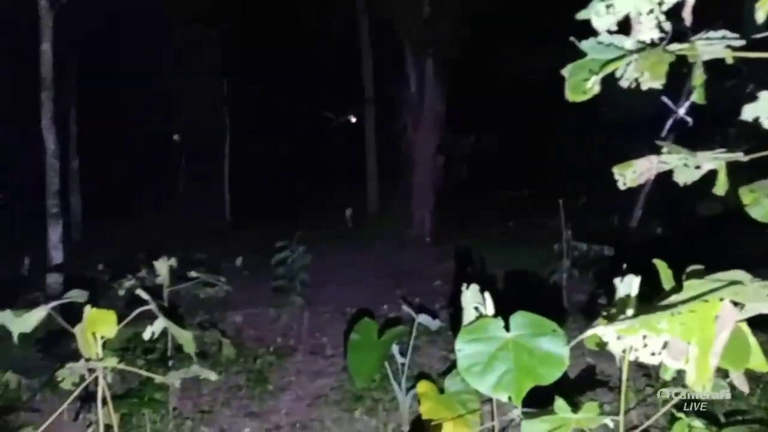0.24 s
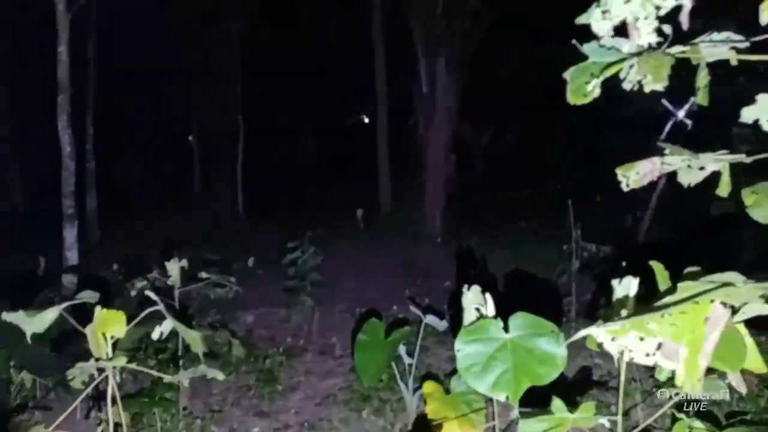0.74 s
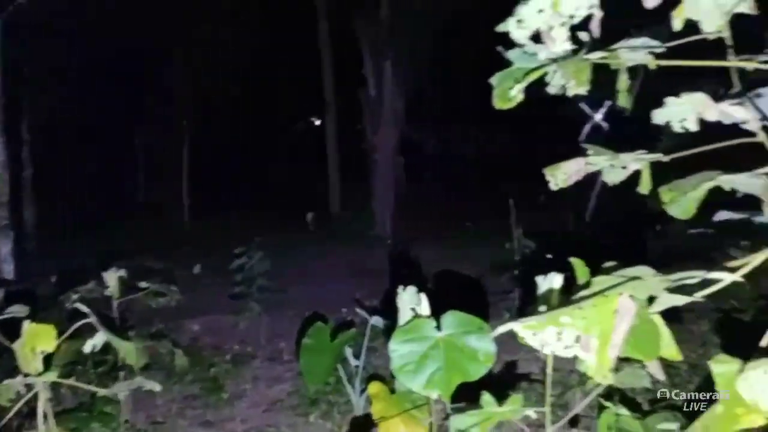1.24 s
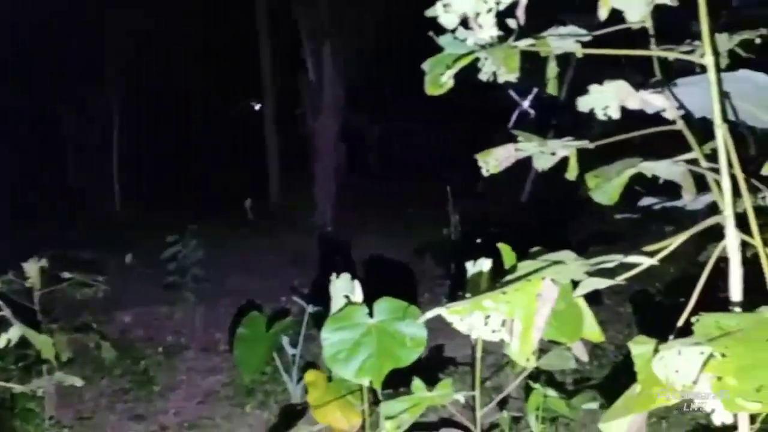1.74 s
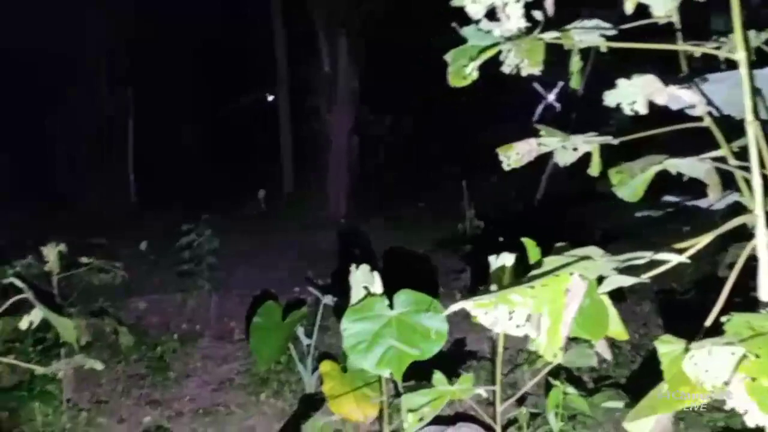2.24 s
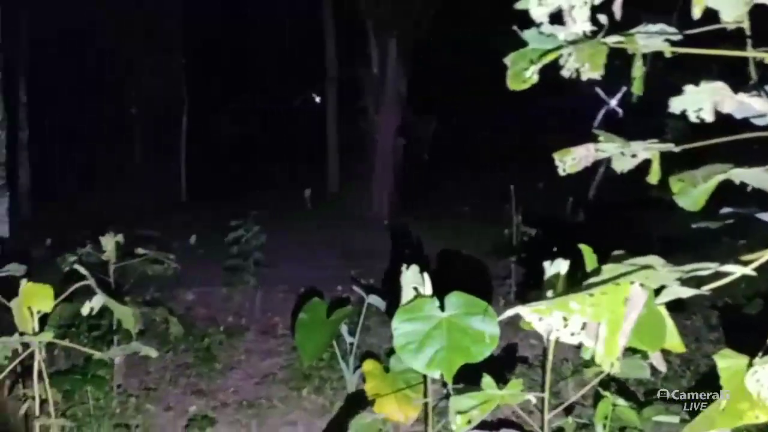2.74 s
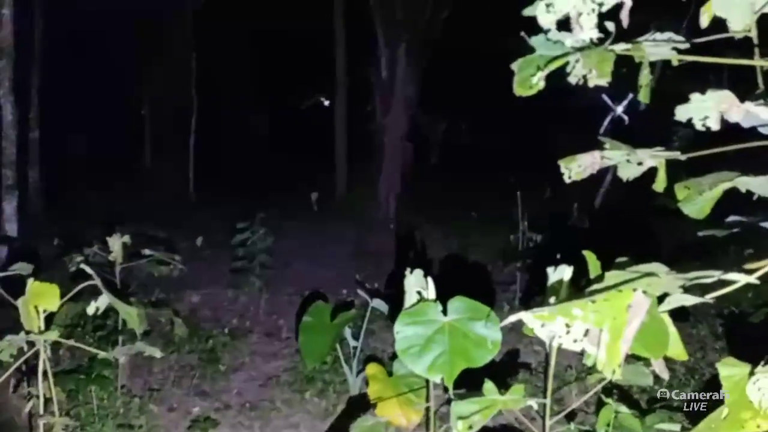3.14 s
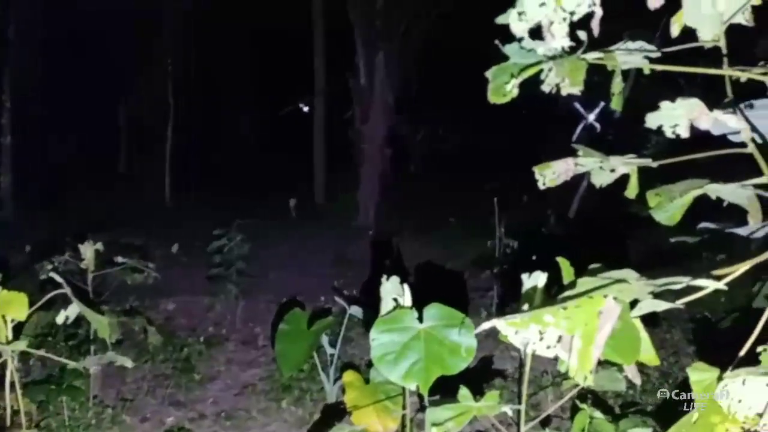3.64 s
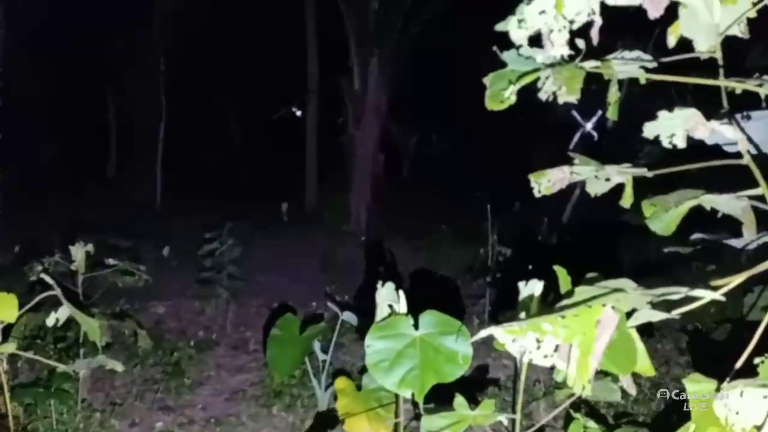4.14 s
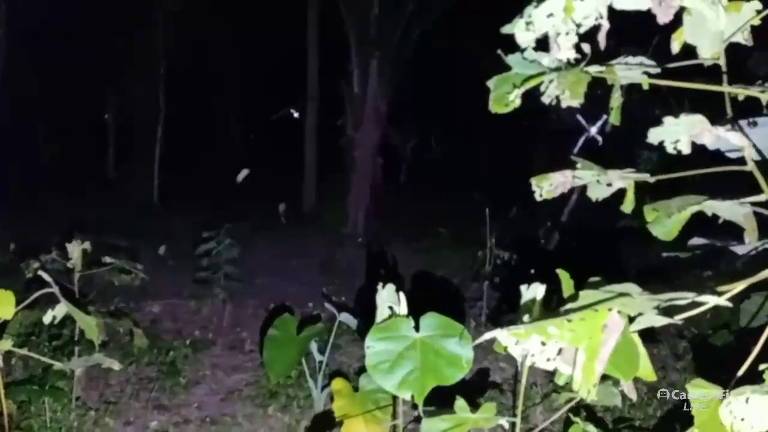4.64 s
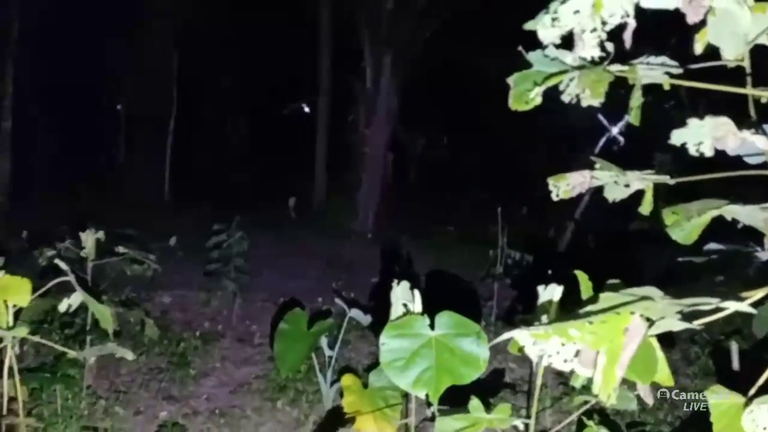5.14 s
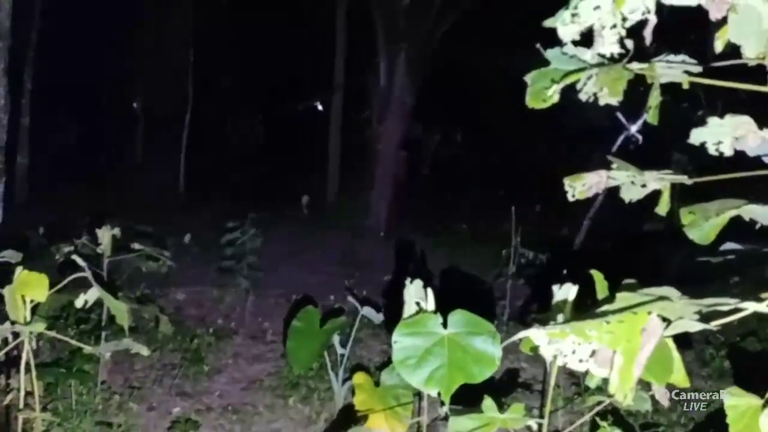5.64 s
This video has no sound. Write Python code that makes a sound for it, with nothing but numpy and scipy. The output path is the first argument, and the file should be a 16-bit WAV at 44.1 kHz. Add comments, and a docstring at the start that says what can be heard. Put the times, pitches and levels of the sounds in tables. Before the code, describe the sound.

A night insect chorus at the edge of a wood, heard on a hand-held microphone. It opens with a loud, bright, finely fluttering hiss that fades by about 0.5 s, leaving a quieter, silky high hiss that slowly grows. Far crickets chirp in short groups of falling tones, blurred by trunks and leaves, most clearly until 1.4 s and again from 2.5 to 4 s, then fainter and fairly regular. Tree crickets trill rapidly in bouts at about 0-1.1, 1.6-3.3 and 3.9-5.5 s, lingering weakly between. A close field cricket gives three sharp, shrill chirps at about 1.7, 1.95 and 2.2 s, the first starting softly, with a short woodland tail. A faint buzz passes near 4.3-4.5 s. Thin rising rasps and very high fizz gather from 4.6 s to the end. Quiet night air and soft low handling bumps, clearest near 2 s, lie underneath.

```python
"""Countless far insects merge into a high hiss at the edge of a wood by night, heard on a hand-held camera.
The hiss is noise in unevenly swelling bands, louder and brighter in an opening that fades in about half a second.
Tree crickets trill falling notes, and far crickets answer from the trees as scattered tones.
A field cricket chirps three times close by, in falling tones with a flaring third harmonic.
Thin rising rasps of sliding noise crowd towards the end; handling bumps and night air lie underneath."""
import sys
import numpy as np
from scipy import signal
from scipy.fft import rfft, irfft
from scipy.io import wavfile
from scipy.ndimage import uniform_filter1d

SR = 44100
rng = np.random.default_rng(int(sys.argv[2]) if len(sys.argv) > 2 else 0)


def store_pcm(level_fs):
    """Save levels as 16-bit WAV."""
    pcm = np.round(np.clip(level_fs, -1, 1) * 32767).astype(np.int16)
    wavfile.write(sys.argv[1], SR, np.atleast_2d(pcm).T)


N = 259704
T = np.arange(N) / SR
FRAME, HOP = 1024, 256  # samples in the short-time spectra of the hisses
BIN_HZ = np.fft.rfftfreq(FRAME, 1 / SR)


def gain_of(db):
    """Decibels to amplitude."""
    return 10 ** (np.asarray(db) / 20)


def evened(x):
    """Scales to an rms of 1."""
    return x / np.sqrt(np.mean(x ** 2) + 1e-20)


def level(curve):
    """Gain at every sample, straight in dB between rows of (t/s, level/dB)."""
    return gain_of(np.interp(T, *np.transpose(curve)))


def swell(start, end, db, rise_s, fall_db_per_s):
    """Gain at every sample: rises until start, holds until end, then dies away."""
    rise = np.clip(1 + (T - start) / rise_s, 0, 1)
    return rise * gain_of(db - fall_db_per_s * np.maximum(T - end, 0))


def add(mix, s, sound):
    """Mixes a sound in at time s, or at the very start if s is negative."""
    part = mix[max(round(s * SR), 0):][:len(sound)]
    part += sound[:len(part)]


def band(hz, width_hz):
    """Noise of rms 1 in one bell-shaped band."""
    bell = np.exp(-((np.fft.rfftfreq(N, 1 / SR) - hz) / width_hz) ** 2)
    return evened(irfft(rfft(rng.standard_normal(N)) * bell, N))


def drift(width_hz):
    """Slow chance of rms 1: noise kept to the lowest frequencies."""
    return band(0, width_hz)


def hiss(spectrum, patchy_db):
    """Many far voices merged: noise of rms 1 whose narrow bands swell and sink on their own."""
    real, imaginary, patches = rng.standard_normal((N // HOP + 5, len(BIN_HZ), 3)).T
    for _ in range(2):  # smooth over neighbouring bands, then over time
        patches = uniform_filter1d(patches, size=4, axis=0)
        patches = evened(uniform_filter1d(patches, size=11, axis=1))
    f, db = np.transpose(spectrum)
    colour = np.interp(np.log(BIN_HZ + 1), np.log(f), db, left=-70)
    bins = (real + 1j * imaginary) * gain_of(colour[:, None] + patchy_db * patches)
    return evened(signal.istft(bins, nperseg=FRAME, noverlap=FRAME - HOP)[1][:N])


def wood(x, t60, count=500):
    """Scatter from trunks and leaves: sparse echoes that die away by 60 dB in t60 seconds."""
    delay = rng.uniform(.003, .45, count)
    echo = rng.choice([-1, 1], count) * gain_of(-60 * delay / t60)
    taps = np.zeros(SR // 2)
    np.add.at(taps, (delay * SR).astype(int), echo)
    return signal.fftconvolve(x, taps / np.linalg.norm(taps))[:N]


def opening_gain():
    """Gain of the loud opening: an early peak, an even fade in dB and a stop."""
    peak_s, end_s, stop_s = 0.068, 0.55, 0.18
    stop = np.clip((end_s - T) / stop_s, 0, 1)
    return stop * swell(peak_s, peak_s, db=-31.5, rise_s=0.47, fall_db_per_s=32.5)


def far_chorus():
    """Far insects merge into a hiss that grows slowly louder, most uneven where few voices sing."""
    # how the distant hiss spreads over pitch: (f/Hz, relative level/dB per Hz)
    chorus_spectrum = [(3000, -52), (4150, -19.5), (5050, -17), (5700, -6), (6300, -7.5), (7000, -1.5),
                       (7500, -0.5), (8300, -7), (9300, -13.5), (10300, -18), (10950, -14), (11500, -27),
                       (13500, -27), (15300, -16)]
    # how unevenly its bands swell: (f/Hz, spread/dB)
    patchiness = [(4000, 4), (5000, 5), (5700, 2.4), (7500, 1.1), (8700, 1.6), (10000, 3.3), (11500, 2.6),
                  (15000, 1.3)]
    start_db, growth_db_per_s = -49.77, 0.74
    spread_db = np.interp(BIN_HZ, *np.transpose(patchiness))[:, None]
    return hiss(chorus_spectrum, spread_db) * gain_of(start_db + growth_db_per_s * T)


def opening_chorus(treble_fade=0.16):
    """The louder, brighter hiss of the opening: it flutters finely and its treble fades faster than its body."""
    # how the opening hiss spreads over pitch: (f/Hz, relative level/dB per Hz)
    opening_spectrum = [(2900, -40), (3500, -5.5), (4400, -5), (5400, -14), (6000, -10), (6800, -12),
                        (7400, -1.5), (7900, -1), (8500, -7), (9200, -19), (10800, -13.5), (13000, -17.5),
                        (14800, -8.5), (15800, -10)]
    bright = hiss(opening_spectrum, patchy_db=2.0) * (1 + 0.049 * drift(110))
    fade = opening_gain()
    body = signal.sosfiltfilt(signal.butter(4, 9000, fs=SR, output="sos"), bright)
    treble = (bright - body) * (fade / fade.max()) ** treble_fade
    return fade * (body + treble)


def night_air():
    """Quiet broad noise of the open night, growing slowly and louder during the opening fade."""
    # how the air noise spreads over pitch: (f/Hz, relative level/dB per Hz)
    air_spectrum = [(25, -25), (52, -35), (85, -2.5), (140, 1.5), (220, -1.5), (450, -6), (1000, -6.5),
                    (1400, -2), (1900, -7), (3000, -5), (4200, -6.5), (12000, -24.5)]
    start_db, growth_db_per_s = -66, 0.6442
    opening_db = -25.5  # against the opening hiss
    gain = np.hypot(gain_of(start_db + growth_db_per_s * T), gain_of(opening_db) * opening_gain())
    return hiss(air_spectrum, patchy_db=2.0) * gain


def trill_gain():
    """Bouts that set in quickly and break off into a weaker, unsteady trill; louder during the opening fade."""
    # bouts of the trill: (full from t/s, end t/s, level/dB)
    trill_bouts = [(0, 1.084, -52.5), (1.557, 3.29, -53), (3.9, 5.517, -52.5), (5.71, 5.72, -62)]
    rise_s, fall_db_per_s = 0.094, 83
    linger_db, linger_fall_db_per_s = -9, 15  # against the bout
    opening_db = -8.5  # against the opening hiss
    power = (gain_of(opening_db) * opening_gain()) ** 2
    flutter = gain_of(-0.5 * drift(28))
    for start, end, db in trill_bouts:
        bout = swell(start, end, db, rise_s, fall_db_per_s)
        linger = flutter * swell(start, end, db + linger_db, rise_s, linger_fall_db_per_s)
        power = power + np.maximum(bout, linger) ** 2
    return np.sqrt(power)


def tree_crickets(glide_hz=340, waver_hz=40):
    """Each singer repeats a short falling note; echoes fill the gaps and beat with it."""
    # the trilling singers: (middle pitch f/Hz, strokes per s, relative level/dB)
    trill_singers = [(3640, 24.2, -1.5), (3594, 29, -6.5), (3694, 22.6, -7)]
    out = np.zeros(N)
    for hz, per_s, db in trill_singers:
        cycle = np.cumsum(per_s * (1 + .02 * drift(3))) / SR % 1 - .5
        pitch = hz - glide_hz * cycle + waver_hz * drift(58.8)
        contact = np.exp(-(cycle / .1) ** 2)
        song = contact * np.sin(2 * np.pi * np.cumsum(pitch) / SR)
        out += gain_of(db) * (gain_of(-8) * evened(song) + evened(wood(song, t60=0.43)))
    steady = out / np.sqrt(uniform_filter1d(out ** 2, size=8000))  # they sing with even effort
    return steady * trill_gain()


def far_low_calls():
    """A few far, low calls: a narrow band of noise that swells and dies away."""
    # the low calls: (full from t/s, end t/s, level/dB)
    call_times = [(0, .05, -57), (.22, .37, -56), (0.836, 1, -74), (1.08, 1.078, -61)]
    gain = sum(swell(start, end, db, rise_s=.07, fall_db_per_s=160) for start, end, db in call_times)
    return band(hz=1656, width_hz=77) * gain


def handling(width_share=0.34):
    """Dull puffs of band noise as the hand shifts on the camera."""
    # soft bumps and scuffs: (middle t/s, level/dB, centre f/Hz, length/s)
    hand_bumps = [(.08, -69, 420, .26), (.151, -67, 133, .28), (0.303, -65, 420, .09),
                  (.436, -61.5, 467, .091), (0.821, -74.5, 346, .24), (1.262, -67.5, 140, .22),
                  (1.518, -65, 106, 0.093), (2.038, -56, 142.6, 0.1495), (2.121, -65.5, 107, .68),
                  (2.5, -66, 84, 0.052), (5.65, -66, 88, .29)]
    out = np.zeros(N)
    for s, db, hz, length in hand_bumps:
        size = int(length * SR)
        puff = evened(band(hz, width_share * hz)[:size] * signal.windows.tukey(size, .8))
        add(out, s - length / 2, gain_of(db) * puff)
    return out


def faint_chirps(spread_s=.015, spread_db=1.5, spread_hz=120, count=9):
    """A loosely regular run of long chirps growing fainter: rows of (t/s, level/dB before trim, f/Hz, strokes)."""
    from_s, gap_s = 4.1, .205
    start_db, fade_db_per_s, middle_hz = -57, 2.5, 4720
    rows = []
    for k, (late, loud, high) in enumerate(rng.standard_normal((count, 3))):
        s = k * gap_s + spread_s * late
        db = start_db - fade_db_per_s * s + spread_db * loud
        rows.append((from_s + s, db, middle_hz + spread_hz * high, 4))
    return rows


def far_crickets(stroke_gap=.036, stroke_s=0.0204, glide_hz=1300, trim_db=8.0, lead_db=-11):
    """Chirps from afar: the overtones are lost and only scatter arrives, new for each stroke."""
    # clear chirps among the trees: (first full stroke t/s, level/dB before trim, middle pitch f/Hz, strokes)
    clear_chirps = [(.005, -41.5, 4350, 3), (.21, -49, 4950, 3), (.37, -47, 4910, 3),
                    (.842, -46.5, 4660, 2), (1.028, -46.5, 4660, 3), (1.248, -48.5, 4600, 2),
                    (2.53, -53, 4690, 3), (2.925, -51, 4770, 3), (3.16, -47.5, 4740, 2),
                    (3.371, -50.5, 4760, 3), (3.59, -50, 4730, 3), (3.85, -48.5, 4770, 2)]
    out = np.zeros(N)
    t = np.arange(0, stroke_s, 1 / SR)
    for s, db, hz, count in [*clear_chirps, *faint_chirps()]:
        pitch = hz - glide_hz * (t / stroke_s - .5)
        tone = np.hanning(len(t)) * np.sin(2 * np.pi * np.cumsum(pitch) / SR)
        for k in range(-1, round(count)):  # one soft stroke leads in
            stroke_gain = gain_of(db + lead_db * (k < 0))
            add(out, s + k * stroke_gap, stroke_gain * wood(tone, t60=0.32, count=1200))
    return gain_of(trim_db) * out


def rasps(length=.05, start_hz=12100, rise_hz=3700, trim_db=-2, faint_per_s=8, spread_db=4):
    """Small bush crickets scrape: bands of noise that slide upwards, blurred by the leaves."""
    # the clearest rasps: (t/s, level/dB before trim)
    clear_rasps = [(3.07, -60), (4.355, -60), (4.61, -53), (4.68, -55), (5.2, -55), (5.385, -55),
                   (5.83, -52)]
    faint_db, growth_db_per_s = -70, 2  # before trim
    out = np.zeros(N)
    t = np.arange(0, length, 1 / SR)
    grit = band(0, width_hz=1000)
    pitch = start_hz + rise_hz * t / length
    slide = np.sin(2 * np.pi * np.cumsum(pitch) / SR) * signal.windows.tukey(len(t), .2)
    # faint ones come at random and grow louder
    faint_s = np.cumsum(rng.uniform(.5, 1.5, 80)) / faint_per_s
    faint_levels = faint_db + growth_db_per_s * faint_s + spread_db * rng.uniform(-1.1, 1, len(faint_s))
    for s, db in [*clear_rasps, *zip(faint_s, faint_levels)]:
        scrape = evened(slide * grit[rng.integers(N // 2):][:len(t)])
        add(out, s, gain_of(db + trim_db) * wood(scrape, t60=0.18, count=1500))
    return out


def fizz():
    """A very high hiss that goes with the rasps and grows with them."""
    # how the fizz spreads over pitch: (f/Hz, relative level/dB per Hz)
    fizz_spectrum = [(9000, -21), (11800, -5), (13500, -26), (14500, 2), (15400, 1), (16000, -2)]
    # its growth: (t/s, level/dB)
    fizz_levels = [(0, -79), (2.7, -73), (4.1, -69), (4.7, -56), (5.89, -53)]
    return hiss(fizz_spectrum, patchy_db=0.5) * level(fizz_levels)


def stroke(second_db=-28, third_db=0, shrill_hz=15500, shrill_width_hz=1000, bite_db=1.5):
    """The scraper runs along the file once: a falling tone whose third harmonic flares in a high resonance."""
    # the scraper catches twice more as the wings close: (t/s from the stroke's start, mean level/dB)
    wing_catches = [(.0136, -5), (.0177, -1)]
    start_hz, floor_hz, slowing_s = 5950, 4620, .0118  # the wings slow down, so the pitch sinks
    stroke_s, push_s, ease_db_per_s, catch_s = 0.023, 0.0055, 1650, .0009
    t = np.arange(0, stroke_s, 1 / SR)
    pitch = (floor_hz + (start_hz - floor_hz) * np.exp(-t / slowing_s)) * rng.normal(1, 0.0039)
    # the first push swells and eases off
    pressure = np.sin(np.pi / 2 * np.minimum(t / push_s, 1))
    pressure = pressure * gain_of(-ease_db_per_s * np.maximum(t - push_s, 0))
    for s, db in wing_catches:  # no two strokes bite alike
        bite = gain_of(db + bite_db * rng.standard_normal())
        pressure = pressure + bite * np.exp(-((t - s) / catch_s) ** 2)
    phase = 2 * np.pi * np.cumsum(pitch) / SR
    flare = np.exp(-((3 * pitch - shrill_hz) / shrill_width_hz) ** 2)
    tone = np.sin(phase) + gain_of(second_db) * np.sin(2 * phase)
    tone = tone + gain_of(third_db) * flare * np.sin(3 * phase)
    return pressure * signal.windows.tukey(len(t), .1) * tone


def near_cricket(wood_db=-13):
    """Close chirps of clean strokes that gain strength, their early echoes and a short tail from the trees."""
    # the close chirps: (t/s, strokes, gap between strokes/s, first stroke against full strength/dB)
    close_chirps = [(1.6802, 4, .0356, -19), (1.943, 3, 0.033, -4.5), (2.167, 3, .0327, -1.7)]
    # echoes from the ground and near trunks: (delay t/s, level/dB against the direct sound)
    early_echoes = [(.0065, -14), (0.0094, -12), (0.0174, -11.5)]
    full_db, warm_up = -29, 0.28  # warm_up: share of the softness left from one stroke to the next
    direct = np.zeros(N)
    for s, count, gap, soft_db in close_chirps:
        for k in range(round(count)):
            add(direct, s + k * gap, gain_of(full_db + soft_db * warm_up ** k) * stroke())
    out = direct + gain_of(wood_db) * wood(direct, t60=0.66)
    for delay, db in early_echoes:
        add(out, delay, gain_of(db) * direct)
    return out


def far_buzz():
    """One brief far buzz: a band of high noise that swells and breaks off."""
    return band(hz=6330, width_hz=240) * swell(4.26, 4.5, db=-53, rise_s=.05, fall_db_per_s=250)


def scene():
    """All the insects, near and far, over the quiet night air and the handling."""
    hisses = far_chorus() + opening_chorus() + night_air()
    crickets = tree_crickets() + far_crickets() + near_cricket()
    thin_voices = far_low_calls() + rasps() + fizz() + far_buzz()
    return (hisses + crickets + thin_voices + handling())[None]


def record(dry):
    """The recorder's band limit: a steep low-pass."""
    edge_hz = 15780
    low_pass = signal.firwin(701, edge_hz, window=("kaiser", 9), fs=SR)
    return signal.oaconvolve(dry, low_pass[None], "same")


dry = scene()
out = record(dry)
store_pcm(out)
```